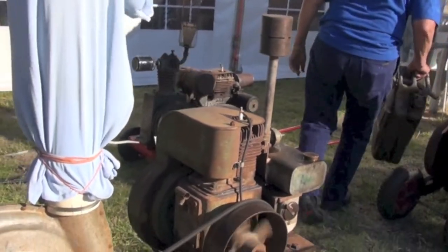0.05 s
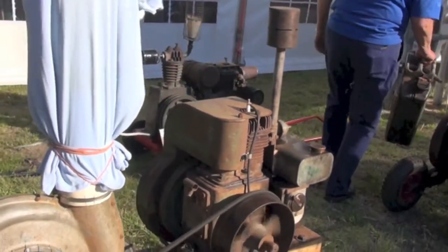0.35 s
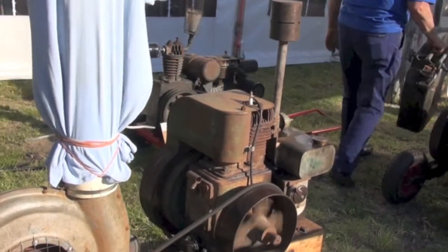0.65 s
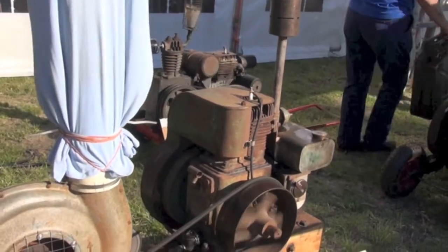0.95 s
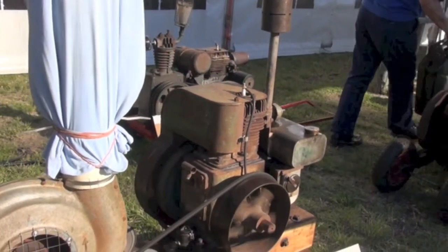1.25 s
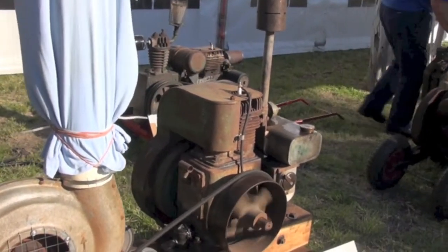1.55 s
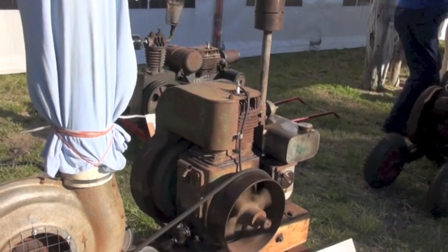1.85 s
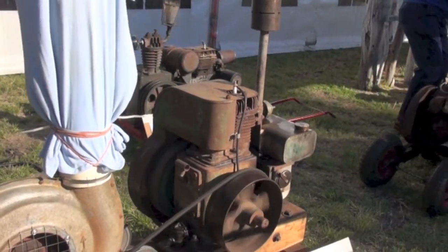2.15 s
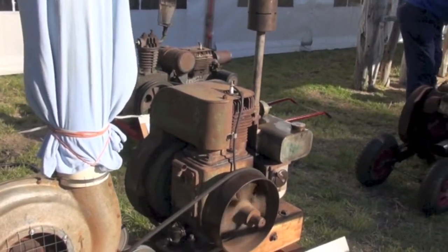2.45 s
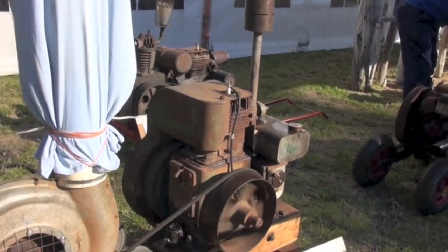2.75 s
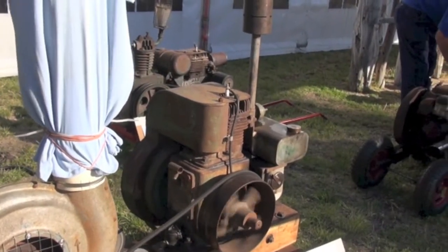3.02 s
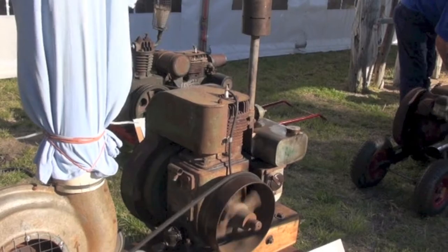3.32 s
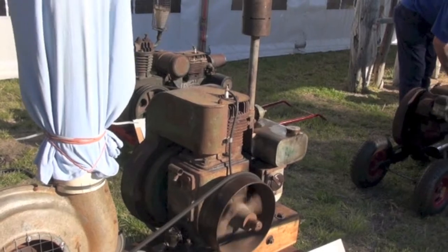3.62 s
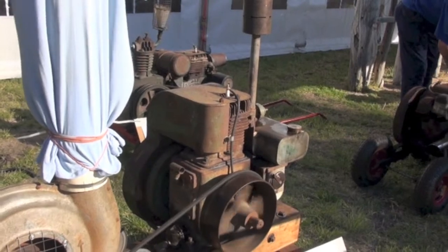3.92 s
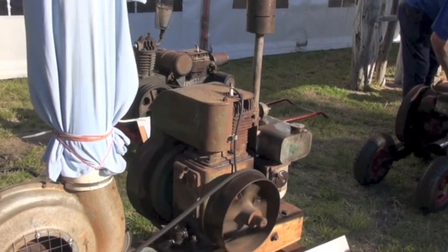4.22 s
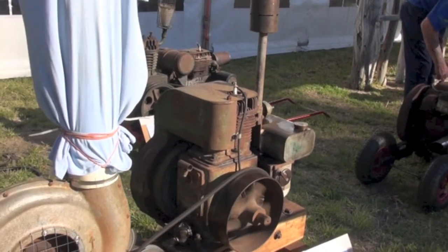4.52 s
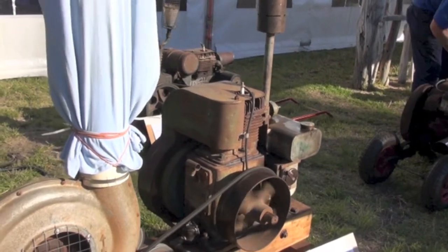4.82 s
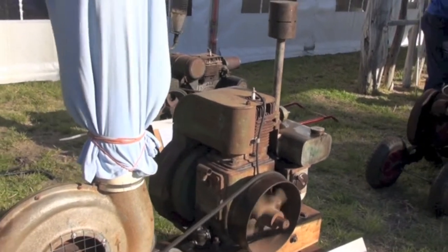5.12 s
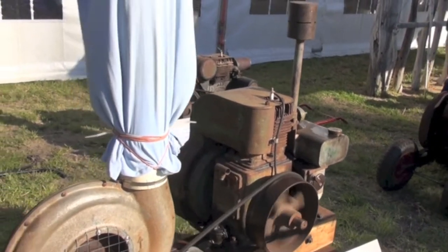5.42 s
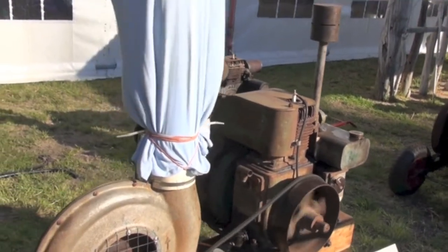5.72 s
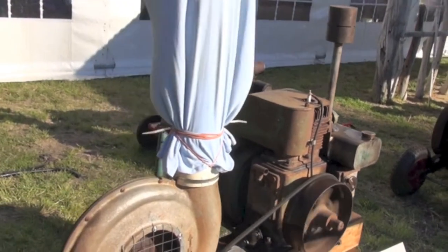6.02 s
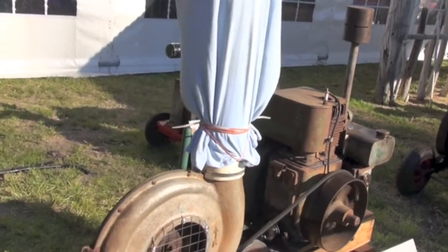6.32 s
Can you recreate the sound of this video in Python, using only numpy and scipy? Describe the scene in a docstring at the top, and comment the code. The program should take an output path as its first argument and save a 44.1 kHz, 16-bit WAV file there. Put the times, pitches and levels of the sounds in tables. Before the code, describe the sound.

A blower whines and roars with air throughout, its pitch fluttering slightly with each stroke of the old stationary petrol engine that turns it. The engine keeps up a fast, even chatter of sharp knocks, small ticks and ringing metal taps, while loose tin rattles softly. Now and then one knock is stronger or weaker. Both machines stand close by in the open air, heard without echo, nearly all in the right channel.

```python
"""Old engine driving a blower

Out on the grass of a machinery show, an old single-cylinder petrol engine turns a blower by a flat belt.
The twelve spinning blades whine, the air roars, and the pitch surges with every power stroke.
Each engine cycle brings a firing knock, a tappet tick and two ringing valve taps; loose tin rattles."""
import sys
import numpy as np
from scipy import signal
from scipy.fft import rfft, irfft
from scipy.io import wavfile

SR = 44100
rng = np.random.default_rng(int(sys.argv[2]) if len(sys.argv) > 2 else 0)


def to_wav(sig):
    """Store sig (one row per channel, or 1-D mono) as 16-bit WAV at the path in sys.argv[1].

    Samples outside -1..1 are clipped; the rate is SR.
    """
    pcm = np.clip(np.atleast_2d(sig), -1, 1) * 32767
    pcm = np.round(pcm).astype(np.int16)
    wavfile.write(sys.argv[1], SR, pcm.T)  # frames by channels


N = 285327
TIME = np.arange(N) / SR
SHAFT_HZ, BLADES = 48.165, 12   # the blower's turns per second and its number of blades
FIRST_FIRING_S, CYCLE_S = -0.0267, 0.121071   # the governor holds the engine to one firing every cycle

# how loud the note of the passing blades is: time_s, level_db
BLADE_TONE = [(0, -23), (0.5, -20.5), (1.1, -22), (1.4, -21), (2.4, -21), (3.9, -22.3), (4.8, -21),
              (5.07, -24), (5.2, -20.5), (5.65, -22.5), (6.47, -21.5)]
# how loud the note an octave above it is: time_s, level_db
OCTAVE = [(0, -36.5), (1.1, -36.5), (1.8, -36.5), (2.3, -33.5), (3.3, -35.5), (4.0, -36), (5.4, -32.5),
          (6.47, -34)]
# weaker notes from the uneven blades: multiple_of_shaft_speed, level_db
UNEVEN_BLADES = [(5, -44.5), (6, -39.5), (7, -41), (8, -41.5), (9, -39.5), (10, -49), (11, -45.5),
                 (17, -44), (18, -49), (23, -62), (36, -59), (38, -46.5), (39, -53)]


def blower_whine(turns, surge, sway_db=0.66, flutter_db=0.8, octave_db_per_percent=1.1):
    """Blades passing the outlet make a note, which gets brighter each time the blower speeds up."""
    def tone(multiple):
        return np.sqrt(2) * np.sin(2 * np.pi * (multiple * turns + rng.random()))
    blade_db, = in_time(BLADE_TONE)
    octave_db, = in_time(OCTAVE)
    surge_percent = 100 * surge
    blade = from_db(blade_db + sway_db * drift(8.2) + flutter_db * drift(29)) * tone(BLADES)
    octave_db += octave_db_per_percent * surge_percent + 2.0 * drift(11)
    octave = from_db(octave_db) * tone(2 * BLADES)
    uneven = sum(from_db(db + 1.5 * drift(7.4)) * tone(multiple) for multiple, db in UNEVEN_BLADES)
    return blade + octave + uneven


# flywheel speed from one firing to the next: fraction_of_cycle, speed_change_fraction
SURGE = [(0, -0.0046), (.15, 0.0082), (.26, 0.009), (.55, 0.0055), (.87, -0.013)]


def speed_surge(wander=0.001096):
    """Each power stroke pulls the blower ahead, then it coasts. Gives the change as a share of its speed."""
    surge = np.interp((TIME - FIRST_FIRING_S) / CYCLE_S, *np.transpose(SURGE), period=1)
    return surge - surge.mean() + wander * drift(2.77)


# slow swells in the air stream (only part of the swing around the average is used): time_s, rush_db, churn_db
AIR_FLOW = [(0.05, -26, -31), (0.6, -29, -31), (1.38, -25.5, -27.5), (1.63, -29, -35.5), (1.65, -26.5, -24),
            (1.97, -29.5, -32.5), (2.18, -26.5, -28), (2.87, -29.5, -33.5), (3.3, -25.5, -28.5),
            (3.72, -27, -31.5), (6.26, -27.5, -29), (6.42, -28, -36)]
# tone colour of the air swirling inside the blower: pitch_hz, level_db
CHURN = [(25, -24), (45, -30), (70, -17.5), (125, -19), (205, -11.5), (262, 0.5), (400, -1.5), (600, -3.5),
         (1000, -15.5), (3000, -42.5)]
# tone colour of the air rushing through: pitch_hz, level_db
RUSH = [(60, -59), (400, -7.5), (700, 1), (1000, 0.5), (1350, -1), (2700, -5), (5000, -10), (6500, -14),
        (11000, -18.5), (14500, -26.5)]
# pitches at which the blower's casing rings: pitch_hz, width_hz, level_db
CASING = [(842, 80, -43), (1566, 97, -39), (1862, 94, -45), (2597, 220, -45), (4840, 410, -50)]


def blower_roar(turns, churn_db=-30.5, rush_db=-30.5, flicker_db=1.08, lumps_db=1.55, throb=0.18):
    """Swirling air throbs low, twice a turn, while a broad rush of air makes the casing ring."""
    rush_swell, churn_swell = [db - db.mean() + 0.31 * drift(4) for db in in_time(AIR_FLOW)]
    churn = from_db(churn_db + 0.62 * churn_swell + lumps_db * drift(20)) * noise(CHURN)
    churn *= 1 + throb * np.sin(4 * np.pi * turns)
    rush = from_db(rush_db) * noise(RUSH) + ringing_noise(CASING)
    rush *= from_db(0.79 * rush_swell + flicker_db * drift(34))
    return churn + rush


# how hard the ordinary firings knock: time_s, strength_db
USUAL_FIRINGS = [(0, -3), (1.0, -0.5), (1.8, -2.2), (2.6, -2.5), (3.2, -0.5), (4.5, -2.8), (5.6, -2),
                 (6.0, -0.5), (6.47, 0.5)]
# firings that stand out, extra hard or half missed: time_s, strength_db
ODD_FIRINGS = [(0.215, 2), (0.457, 2), (1.063, 1.5), (1.184, 2.5), (1.305, 4), (1.668, 2.5), (2.032, -6),
               (2.274, 6), (2.637, -6), (3.242, 2), (3.847, -14), (5.179, 1.5), (5.421, -3), (5.543, -13),
               (6.148, 4)]
# low notes of the engine block and its bed: pitch_hz, level_db, ring_time_s
BLOCK = [(174, -28, 0.016), (240, -29, 0.036), (386, -36, .012), (810, -20.5, 0.019)]
# tone colour of the knock: pitch_hz, level_db
KNOCK = [(200, 0), (450, 1), (800, 7.5), (1600, 2), (2400, -1), (3150, -12), (4500, -5), (8000, -12),
         (15000, -42)]
# pitches at which the cylinder and its tin parts ring: pitch_hz, width_hz, level_db
CYLINDER = [(787, 78, -10), (1220, 120, -11.5), (1575, 63, -11), (1890, 160, -12), (3145, 250, -9.5)]


def firing_knock(fired, body_db=-23.0, crack_db=-14.0, rebound_db=-11.5, puff_db=-37.5):
    """Burning fuel thumps the block, the piston slaps with a crack and rebounds, and a low puff follows."""
    strength_db = strengths(fired, USUAL_FIRINGS, ODD_FIRINGS, scatter_db=1.74)
    thump = clicks(fired - 0.0023, 0.35 * strength_db)   # thump and crack vary less than the slap
    block = sum(from_db(db) * ring(thump, hz, ring_s) for hz, db, ring_s in BLOCK)
    block = cut_bass(block, hz=120.0, order=3)   # the block's thump carries little deep bass
    puffs = clicks(fired + 0.0045, puff_db + rng.normal(0, 1.7, len(fired)))
    puff = cut_bass(ring(puffs, hz=93.0, ring_s=0.058), hz=45.0, order=2)
    # the slap is one short spike of pressure; the cylinder rings on after it
    slap_s = fired - 0.0002
    crack = from_db(crack_db) * ring(clicks(slap_s, 0.4 * strength_db), hz=1960.0, ring_s=0.0022)
    slap = clicks(slap_s, strength_db)
    rebound = clicks(fired + 0.0017, strength_db + rebound_db)
    body = unit_power(0.67 * noise(KNOCK) + ringing_noise(CYLINDER))
    return block + puff + crack + from_db(body_db) * fade(slap + rebound, ring_s=0.034) * body


# tone colour of the tappet's tick: pitch_hz, level_db
TAPPET = [(600, 6), (1500, 0), (4700, 6), (6200, -4.5), (8700, -1.5), (11500, -6.5), (13000, -0.5),
          (15500, -18)]


def tappet_tick(fired, level_db=-31.5, bounce_db=-5.0, scatter_db=2.5):
    """The tappet, the part that pushes a valve open, closes its small gap with a tick and bounces once."""
    tick_db = scatter_db * rng.standard_normal(len(fired))
    hits = clicks(fired + 0.035, tick_db) + clicks(fired + 0.039, tick_db + bounce_db)
    return from_db(level_db) * fade(hits, ring_s=0.034) * noise(TAPPET)


# how firmly the valves shut (each tap follows only a share of this): time_s, strength_db
VALVE_FIRMNESS = [(0, 0), (0.55, -9), (0.95, 7), (1.6, -13), (2.6, -3), (3.7, -6), (4.7, -2), (5.6, -12),
                  (6.0, -1), (6.47, -16)]
# cycles in which a valve lands hard, on the same scale: firing_time_s, strength_db
HARD_LANDINGS = [(-0.027, 10), (0.700, 10.5), (1.426, 14), (2.637, 2), (3.364, 6.4), (4.453, 6)]
# notes of the ringing valve parts: pitch_hz, relative_level_db, ring_time_s
VALVE_NOTES = [(4820, -35.5, 0.022), (5450, -42, 0.018), (5680, -37.5, 0.027), (6930, -35, .006),
               (8740, -39, 0.019), (8710, -45, 0.026), (10980, -36.5, .008)]


def valve_taps(fired, ping_db=-33.0, landing_boost_db=3.5, jitter_s=0.00089, uneven_db=2.0):
    """One valve shuts with a thin ping; the other grazes its seat, then lands with a fuller ring."""
    def tap(delay_s, db):
        late, louder = rng.standard_normal((len(fired), 2)).T
        return clicks(fired + delay_s + jitter_s * late, db + uneven_db * louder)
    firmness = strengths(fired, VALVE_FIRMNESS, HARD_LANDINGS, scatter_db=4)
    ping = ring(tap(0.0645, ping_db + 0.33 * firmness), hz=8730.0, ring_s=0.027)
    graze = tap(0.072, -7.0 + 0.26 * firmness)
    landing = tap(0.0755, 0.52 * firmness)
    notes = sum(from_db(db + uneven_db * drift(26)) * ring(graze + landing, hz, ring_s)
                for hz, db, ring_s in VALVE_NOTES)
    return ping + from_db(landing_boost_db) * notes


# tone colour of the rattle: pitch_hz, level_db
RATTLE = [(400, -5), (1500, 9.5), (4500, -5.5), (10000, -22.0), (15000, -29)]


def rattle(per_s=140.0, level_db=-43.0, spread_db=1.5):
    """Loose tin parts and the belt chatter at random."""
    touches = rng.random(N) < per_s / SR
    force = from_db(spread_db * np.minimum(rng.exponential(1, N), 3))
    return from_db(level_db) * unit_power(fade(touches * force, ring_s=0.016) * noise(RATTLE))


def strengths(times, trend, standouts, scatter_db):
    """Strength of a blow in each cycle: a slow trend plus chance, except where a cycle stands out."""
    db = np.interp(times, *np.transpose(trend)) + scatter_db * rng.standard_normal(len(times))
    for time_s, standout_db in standouts:
        db[np.argmin(abs(times - time_s))] = standout_db
    return db


def from_db(db):
    """Turn decibels into a number to multiply by."""
    return 10 ** (np.asarray(db) / 20)


def unit_power(x):
    """Scale a signal so its average power is 1."""
    return x / np.sqrt(np.mean(x ** 2) + 1e-20)


def in_time(rows):
    """Join a table's points with straight lines: one curve for each column after the time."""
    times, *columns = np.transpose(rows)
    return [np.interp(TIME, times, column) for column in columns]


def drift(rate_hz):
    """A random wobble of size about 1, mostly slower than rate_hz."""
    hz = np.arange(N // 2 + 1) * SR / N
    return unit_power(irfft(rfft(rng.standard_normal(N)) / (1 + (hz / rate_hz) ** 2), N))


def noise(colour):
    """Noise of power 1; the table says how strong its pitches are next to each other."""
    hz, db = np.transpose(colour)
    all_hz = np.arange(N // 2 + 1) * SR / N
    gain = from_db(np.interp(np.log(all_hz + 1), np.log(hz), db))
    return unit_power(irfft(rfft(rng.standard_normal(N)) * gain, N))


def ringing_noise(notes):
    """Each note of a metal part is kept ringing by noise of its own."""
    total = np.zeros(N)
    for hz, width_hz, db in notes:
        decay = np.exp(-np.pi * width_hz / SR)
        feedback = [1, -2 * decay * np.cos(2 * np.pi * hz / SR), decay ** 2]
        total += from_db(db) * unit_power(signal.lfilter([1, 0, -1], feedback, rng.standard_normal(N)))
    return total


def ring(hits, hz, ring_s):
    """Each click starts a pure note that dies away by 60 dB in ring_s."""
    decay = np.exp(-np.log(1000) / (ring_s * SR))
    angle = 2 * np.pi * hz / SR
    return signal.lfilter([0, np.sin(angle)], [1, -2 * decay * np.cos(angle), decay ** 2], hits + 1e-18)


def clicks(times, db):
    """One click at each time, each with its own level."""
    track = np.zeros(N)
    at = np.round(times * SR).astype(int)
    inside = (at >= 0) & (at < N)
    track[at[inside]] = from_db(db)[inside]
    return track


def fade(hits, ring_s):
    """A loudness curve that jumps at each click and dies away by 60 dB in ring_s."""
    return signal.lfilter([1], [1, -np.exp(-np.log(1000) / (ring_s * SR))], hits + 1e-18)


def cut_bass(x, hz, order):
    """Turn down everything below hz; a higher order cuts more steeply."""
    return signal.sosfilt(signal.butter(order, hz, "high", fs=SR, output="sos"), x)


def scene(jitter_s=0.0005):
    """Blower and engine stand close together in the open; one microphone feeds the right channel."""
    beats = np.arange(FIRST_FIRING_S, N / SR, CYCLE_S)
    fired = beats + jitter_s * rng.standard_normal(len(beats))
    engine = firing_knock(fired) + tappet_tick(fired) + valve_taps(fired) + rattle()
    surge = speed_surge()
    turns = np.cumsum(SHAFT_HZ * (1 + surge)) / SR
    blower = blower_whine(turns, surge) + blower_roar(turns)
    return np.array([np.zeros(N), 2 * (blower + engine)])


# tone colour of the hiss on the unused left input: pitch_hz, level_db
HISS = [(25, -1), (55, -2), (300, -5), (650, -15), (950, -2), (2000, -12), (4000, -16), (8000, -23),
        (15000, -23)]


def record(dry, leak_db=-54.0, hiss_db=-65.0, low_cut_hz=53.0, high_cut_hz=15750):
    """The deepest bass and highest treble are cut; the left holds only hiss and a trace of the right."""
    right = cut_bass(dry[1], low_cut_hz, order=4)
    left = dry[0] + from_db(leak_db) * right + from_db(hiss_db) * noise(HISS)
    treble_cut = signal.ellip(16, 0.1, 90, high_cut_hz, fs=SR, output="sos")
    return signal.sosfilt(treble_cut, np.array([left, right]))


dry = scene()
out = record(dry)
to_wav(out)
```